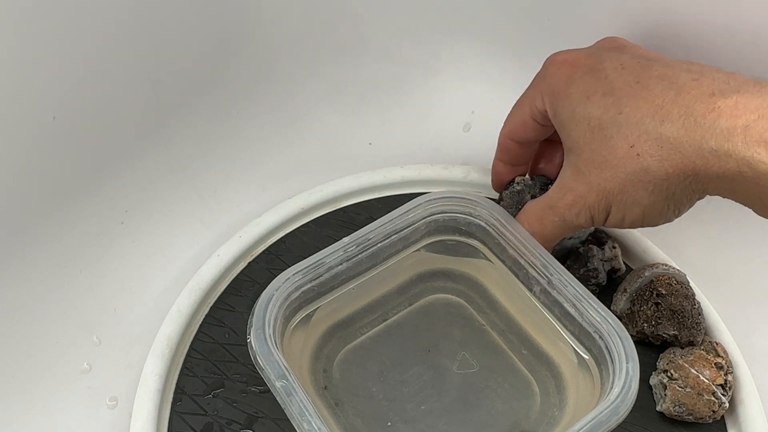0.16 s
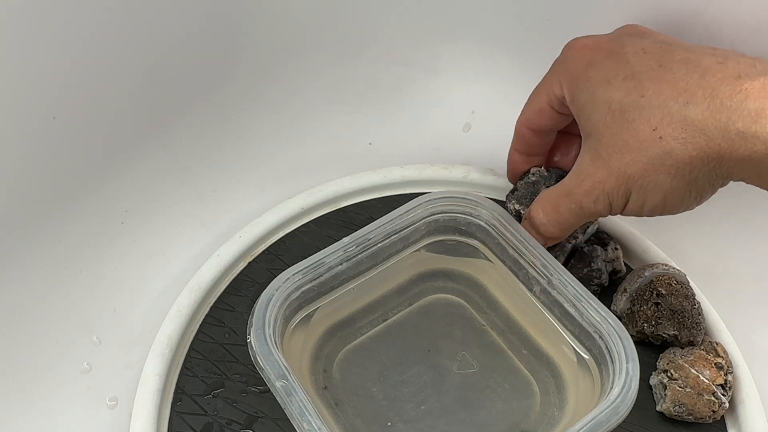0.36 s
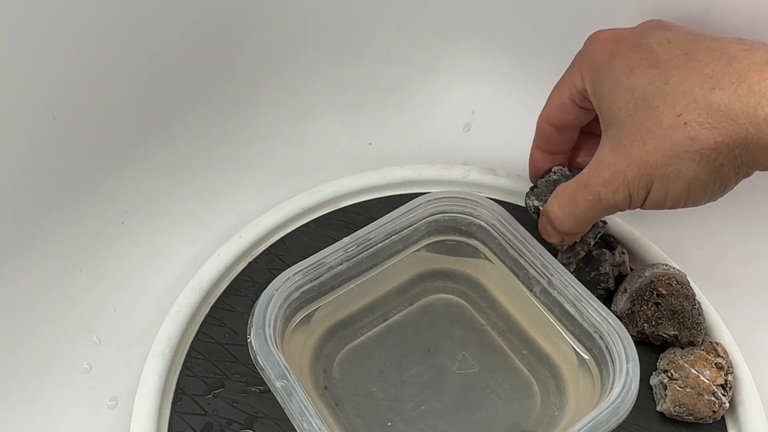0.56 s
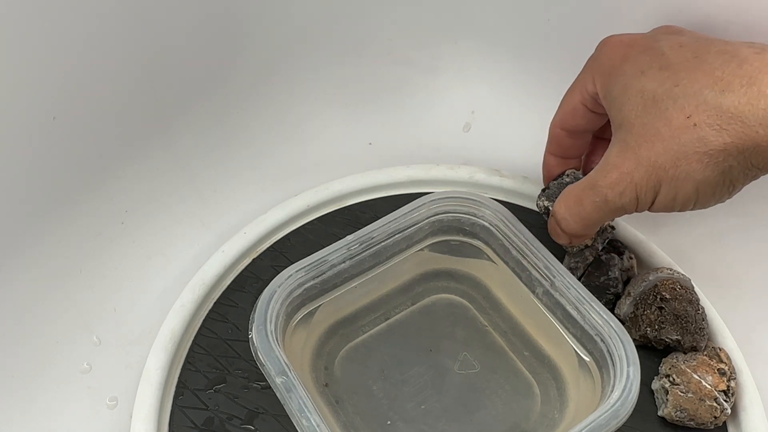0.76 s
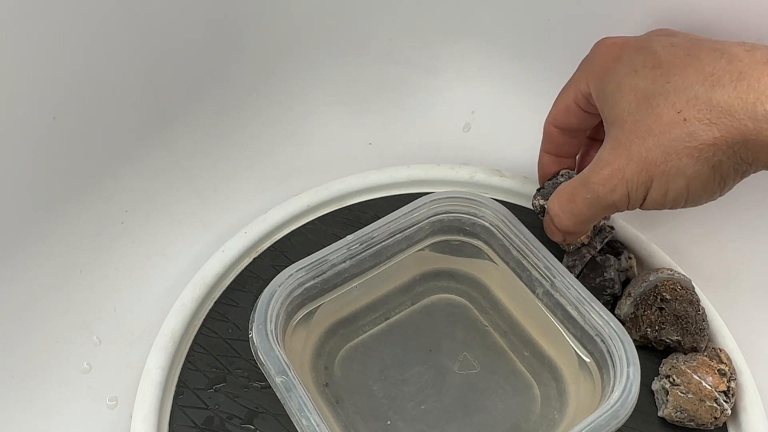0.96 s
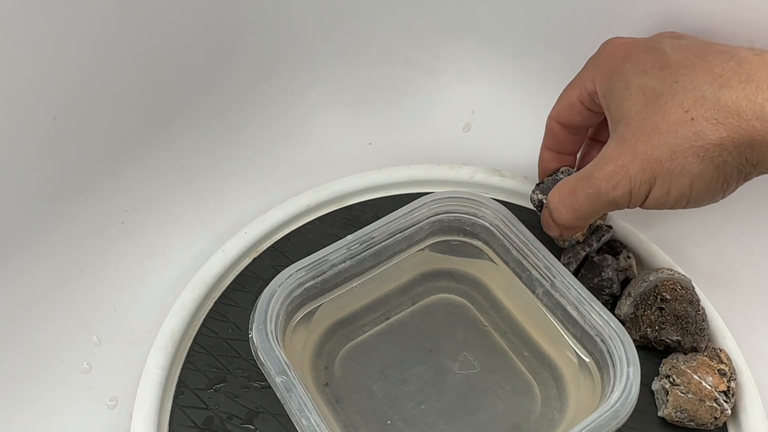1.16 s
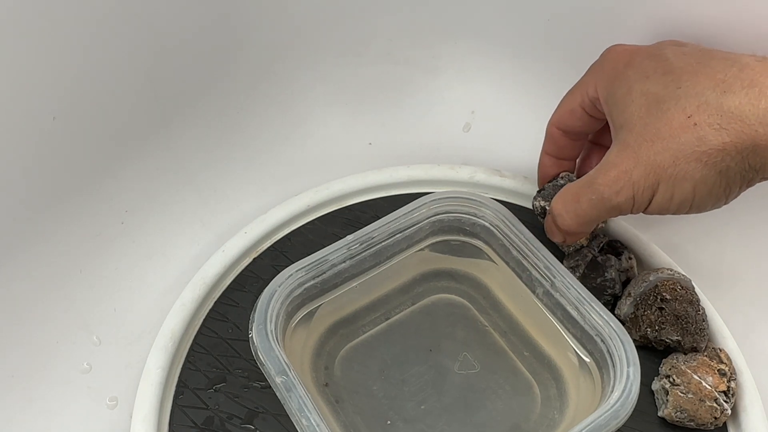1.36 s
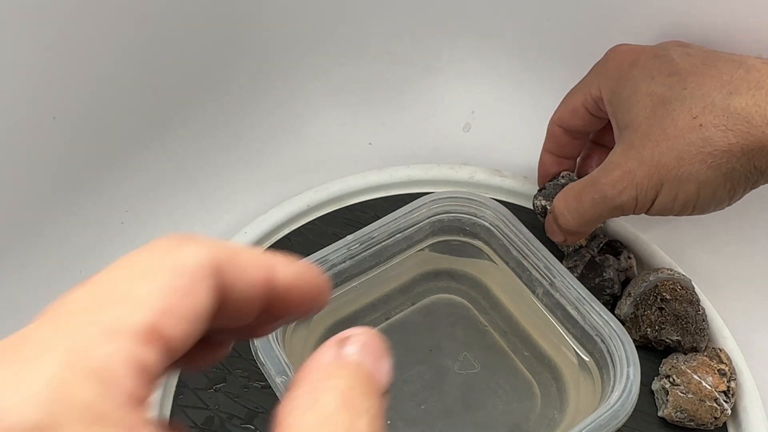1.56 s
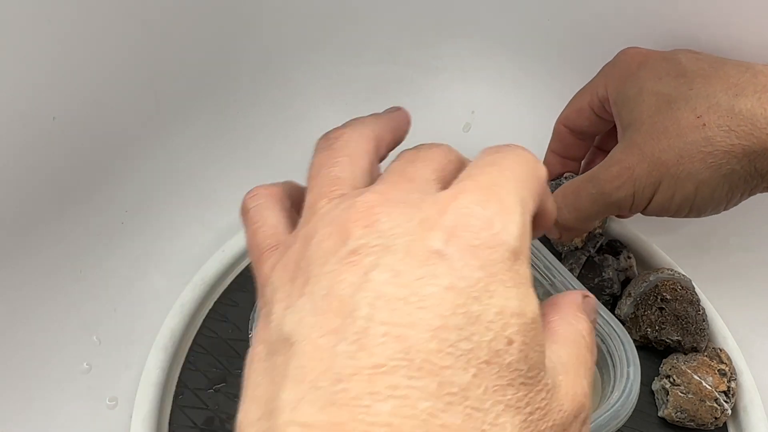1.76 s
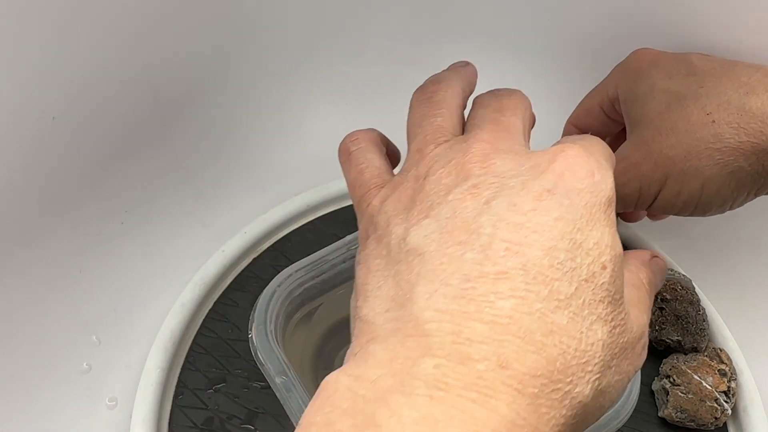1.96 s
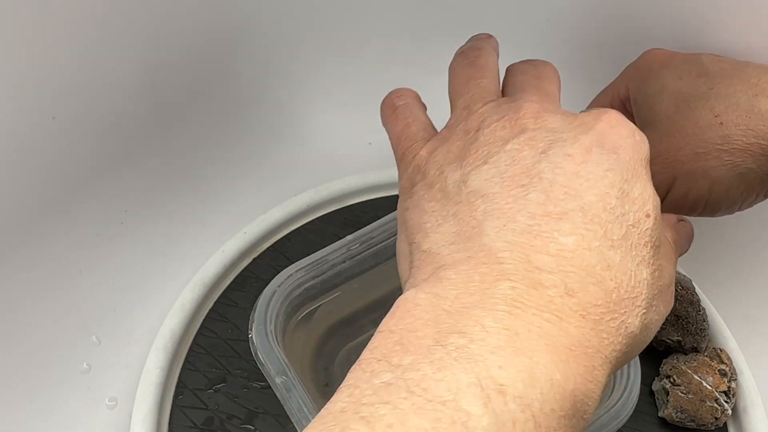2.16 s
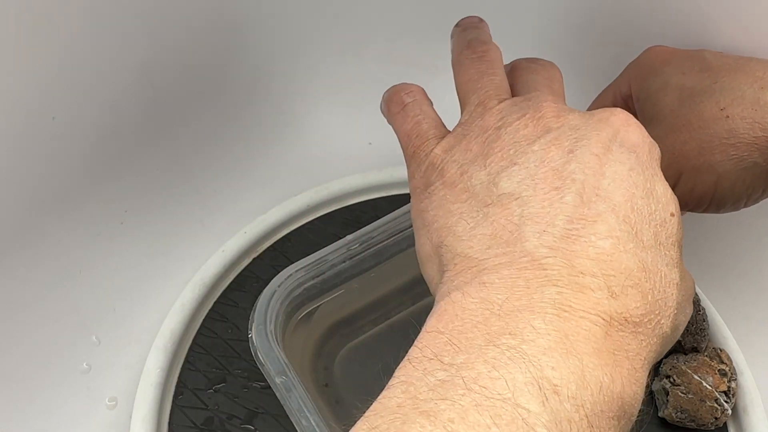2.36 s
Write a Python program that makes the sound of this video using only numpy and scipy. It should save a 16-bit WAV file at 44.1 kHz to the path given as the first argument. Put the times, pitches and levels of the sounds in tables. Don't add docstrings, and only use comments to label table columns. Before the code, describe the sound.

Stone clatter up close: sharp clicks, hollow plastic knocks and short gritty scrapes in a basin

```python
import sys
import numpy as np
from scipy import signal
from scipy.fft import rfft, irfft
from scipy.io import wavfile
from scipy.ndimage import uniform_filter1d

SR = 44100
rng = np.random.default_rng(int(sys.argv[2]) if len(sys.argv) > 2 else 0)


def gain_from_decibels(decibels):
    exponent = np.asarray(decibels, float) / 20
    return 10 ** exponent


def int16_out(signal):
    q = np.round(np.clip(np.atleast_2d(signal).T, -1, 1) * 32767)
    wavfile.write(sys.argv[1], SR, q.astype(np.int16))


N = 105840

# [f/Hz, level/dB]
HUSH_COLOUR = [(20, -46), (42, -9.5), (80, 10.5), (460, -8.5), (1290, -20.5), (1550, -23), (5500, -40),
               (14000, -45.5)]
# [f/Hz, width/Hz, level/dB]
RUMBLE = [
    (58.2, 10, 1),
    (114, 13, -56.5),
    (14300, 900, -79),
]
# [t/s, level/dB]
HUM_SWELL = [(0.0, -60), (0.69, -49), (0.97, -61), (1.02, -48), (1.28, -52), (1.31, -61), (1.36, -47),
             (1.42, -61), (1.45, -46), (1.82, -56.5), (1.86, -48), (1.91, -58), (2.01, -47.5), (2.05, -58),
             (2.08, -46), (2.15, -54.5), (2.25, -47), (2.4, -65.5)]
# [f/Hz, level/dB]
GRIT_COLOUR = [(1500, -6.5), (2500, -8), (4500, -11), (6500, -5.5), (9000, -10.5), (16000, -14.5)]
# [start t/s, length/s, body level/dB, centre f/Hz, grit level/dB]
SCRAPES = [(.01, 0.087, -52, 710, -61.5), (0.071, 0.083, -52, 500, -57), (0.174, 0.027, -42.5, 680, -74),
           (0.218, 0.05, -42, 820, -66), (0.333, 0.043, -39.5, 940, -65), (0.434, 0.023, -34.5, 900, -52.5),
           (0.451, 0.25, -42, 402.6, -61), (0.688, .1, -52, 303.5, -62.5), (0.796, 0.048, -41, 900, -64.5),
           (0.86, 0.034, -40, 996, -71.5), (0.9, 0.06, -51, 702, -80), (1.105, 0.045, -53, 900, -88.5),
           (1.286, 0.033, -38, 800, -58.5), (1.326, 0.047, -45.5, 438, -88.5),
           (1.56, 0.15, -66.5, 500, -76.5), (1.767, 0.036, -55.5, 500, -59), (1.937, 0.16, -47.5, 343, -65),
           (2.047, 0.019, -33, 729, -52), (2.098, 0.12, -54, 335, -73), (2.282, 0.019, -62, 900, -96)]
# [start t/s, length/s,
# level/dB, centre f/Hz]
RUBS = [(0.011, .14, -56.5, 1300), (.185, 0.017, -43.5, 465), (0.23, 0.055, -39.5, 452),
        (0.49, 0.032, -36.5, 458), (0.57, .035, -36, 430), (.53, .03, -53.5, 120), (0.63, .06, -53.5, 115),
        (.74, 0.057, -55.5, 500), (.9, .06, -50, 1173), (1.402, 0.13, -57.5, 1230),
        (1.585, 0.015, -45.5, 515), (1.642, 0.017, -51.5, 500), (1.758, 0.012, -46, 448),
        (1.77, 0.051, -63.5, 900), (2.1, 0.011, -42, 1040), (1.96, .04, -49.5, 136.5),
        (2.06, .03, -36.5, 130), (2.1, .14, -53.5, 116), (2.187, 0.031, -61.5, 1120),
        (2.287, 0.022, -51, 830), (1.22, .05, -64, 420), (2.066, .045, -36, 270), (2.058, 0.016, -30, 640),
        (.967, 0.012, -39.5, 950), (1.0, 0.044, -53, 1100), (1.17, .04, -57.5, 1060),
        (1.255, 0.01, -52, 1150), (1.94, .06, -47.5, 460), (.24, 0.027, -42, 1050), (.012, .012, -48, 600),
        (.436, .012, -38.5, 620), (2.33, 0.011, -54, 910), (1.45, 0.09, -56.5, 120), (0.31, .05, -50.5, 93),
        (.82, 0.022, -44, 1100), (2.4, 0.035, -54, 780)]
# [t/s, peak level/dB, centre f/Hz, contact/s]
KNOCKS = [
    (0.074, -39.5, 480, 0.004),
    (0.438, -28.5, 669, 0.0038),
    (0.545, -32, 480.6, 0.0043),
    (0.576, -28, 451, 0.004),
    (0.783, -48.5, 450, 0.0045),
    (0.969, -40.5, 486, 0.00324),
    (1.347, -31.5, 486, 0.00386),
    (1.688, -51.5, 474, 0.0042),
    (2.059, -27, 800, 0.0036),
]
# [t/s, peak level/dB, centre f/Hz, contact/s]
TAPS = [(0.185, -38.5, 1083, 0.0042), (0.215, -37, 998, 0.0043), (0.34, -40.5, 1249, 0.0037),
        (0.462, -27.5, 1042, 0.0033), (0.62, -33.5, 1057, 0.004), (0.658, -27.5, 1270, 0.0045),
        (0.709, -36.5, 1062, 0.004), (0.823, -31.5, 974, 0.004), (0.869, -35, 1370, 0.0041),
        (1.061, -48, 990, 0.0031), (1.14, -43.5, 1353, 0.0044), (1.686, -51.5, 1270, 0.0048),
        (1.859, -43.5, 1270, 0.0043), (1.994, -36.5, 1360, 0.00395), (2.029, -34, 1270, 0.0041),
        (2.333, -48.5, 885, 0.00356), (1.762, -40, 1890, 0.0037), (1.112, -56, 1720, 0.005),
        (.547, -32, 2075, .004)]
# [f/Hz, level/dB, time to fall 60 dB/s, share in the side channel]
MODES = [(115.6, 8, 0.14, -0.18), (149.4, 3.5, 0.15, -.2), (219, -4.5, 0.081, 0.28), (256.3, 0, 0.13, 0.3),
         (370.6, -5.5, 0.042, -0.76), (457.4, -2.5, 0.052, 0.42), (554.6, -6.5, 0.056, 0.32),
         (755, -6.5, 0.017, 0.44), (900, -7, 0.04, -0.4), (1049, -6, 0.077, 0.48), (1270, -3, 0.031, 1.),
         (1374, -10, 0.046, -0.12), (1743, -14, 0.091, 0.53), (2075, -18.5, 0.018, -3.4)]
# [t/s, peak level/dB, centre f/Hz, time to fall 60 dB/s]
CLICKS = [(0.033, -48, 4170, 0.028), (0.0775, -27, 3150, 0.016), (0.3387, -42, 7200, 0.025),
          (0.4359, -32, 3100, 0.081), (0.4593, -30.5, 5470, 0.013), (0.4642, -18.5, 6150, 0.009),
          (0.4985, -34.5, 2980, 0.068), (0.5032, -24, 4470, 0.03), (0.521, -29, 5440, 0.014),
          (0.5299, -22.5, 5280, 0.016), (0.5461, -11, 5940, 0.034), (0.573, -3, 7330, 0.027),
          (0.6221, -21, 5180, 0.023), (0.66, -16, 3600, 0.02), (0.7077, -39, 2700, 0.052),
          (0.823, -39, 3220, 0.068), (0.8792, -42, 2910, 0.024), (0.9658, -54, 5160, 0.04),
          (1.2933, -47.5, 6770, 0.076), (1.3043, -42.5, 3150, 0.028), (1.3437, -16.5, 5250, 0.015),
          (1.6851, -43, 3030, 0.036), (1.7607, -29.5, 5150, 0.024), (1.9725, -41.5, 5280, 0.043),
          (1.9922, -26, 5520, 0.025), (2.03, -35.5, 3100, 0.052), (2.054, -21, 5460, 0.043),
          (2.398, -35, 6430, 0.047)]
# [f/Hz, level/dB]
STONE_COLOUR = [(900, -49), (1500, 10), (2500, -4), (5400, 4.5), (7500, 2.5), (8800, -1.5), (13400, 2.5),
                (16500, 3)]
# [delay t/s, level/dB]
WALL_ECHOES = [
    (.0024, -14),
    (.0055, -15),
]
# [f/Hz, level/dB]
HOUSING = [(9200, -2), (10300, -24), (11500, -38), (13300, -12.5), (15800, -23.5), (16600, -74.5)]
# [f/Hz, left lead/radians]
PORT_PHASE = [(1200, .1), (3000, 1.3), (4100, 1.), (4900, 1.35), (7400, 1.2), (8300, .6), (10000, .7),
              (13000, 1.1)]
# [f/Hz, left minus right level/dB]
PORT_LEVEL = [(60, 0), (300, 1.5), (1300, -.5), (4400, 2), (8000, 2.5), (15000, -0.5)]

SIDES = np.array([[1], [-1]])


def curve(table, hz):
    table = np.array(table, float)
    return np.interp(np.log(np.maximum(hz, 1)), np.log(table[:, 0]), table[:, 1])


def shape(x, gain):
    n = x.shape[-1]
    hz = np.arange(n // 2 + 1) * SR / n
    return irfft(rfft(x) * gain(hz), n)


def unit(x):
    return x / np.sqrt(np.mean(x ** 2))


def bell(hz, centre_hz, octaves):
    distance = np.log2(np.maximum(hz, 1) / centre_hz) / octaves
    return np.exp(-.5 * distance ** 2)


def walk(rate):
    k = int(SR / rate)
    smooth = uniform_filter1d(rng.standard_normal(N), k)
    return unit(uniform_filter1d(smooth, k))


def spans(start, length, rise, fall):
    t = np.arange(N) / SR - start[:, None]
    after_end = np.clip(t - np.abs(length)[:, None], 0, 1)
    return np.clip(t / rise, 0, 1) * np.exp(-after_end / fall)


def slides(table, db):
    start, length = np.array(table).T[:2]
    rise_s = np.clip(0.37 * np.abs(length), .003, .03)
    return spans(start, length, rise_s[:, None], 0.014) * gain_from_decibels(db)[:, None]


def floor():
    mid, side = rng.standard_normal((2, N))
    mid = shape(mid, lambda f: gain_from_decibels(curve(HUSH_COLOUR, f)))
    side = shape(side, lambda f: gain_from_decibels(curve(HUSH_COLOUR, f)) * np.minimum(f / 500, .8))
    hush_db = -52 + walk(2.2) + walk(20)
    out = gain_from_decibels(hush_db) * (mid + side * SIDES) / mid.std()
    swell_db = np.interp(np.arange(N) / SR, *np.array(HUM_SWELL).T)
    for hz, width_hz, db in RUMBLE:
        noise = rng.standard_normal(N)
        band = shape(noise, lambda f: np.exp(-.5 * ((f - hz) / width_hz) ** 2))
        drift_db = swell_db if hz < 80 else 2 * walk(3.3)
        out = out + gain_from_decibels(db + drift_db) * unit(band)
    return out


def room(x):
    t60_s, treble_db, low_db = 0.4, -18, -11.5
    t = np.arange(SR // 2) / SR
    tail = rng.standard_normal((2, len(t))) * gain_from_decibels(-60 * t / t60_s) * np.clip(t / 0.023, 0, 1)

    def colour(f):
        tiles = bell(f, 5300, 0.85) + gain_from_decibels(-5) * (f > 11000)
        return gain_from_decibels(treble_db) * tiles + gain_from_decibels(low_db) * bell(f, 300, 0.86)

    tail = shape(tail, colour) / np.sqrt(t60_s * SR / 14)
    return signal.fftconvolve(x[None], tail, axes=1)[:, :N]


def grit():
    grain_db = 3 * rng.standard_normal(N) + 1.5 * walk(170)
    grains = rng.standard_normal(N) * gain_from_decibels(grain_db)
    hiss = unit(shape(grains, lambda f: gain_from_decibels(curve(GRIT_COLOUR, f)) * (f > 1300)))
    pressure = slides(SCRAPES, np.array(SCRAPES).T[4]).sum(axis=0)
    return hiss * pressure


def stick_slip():
    slips_per_s = 900
    pulses = rng.random(N) < slips_per_s / SR
    pulse_db = 3 * rng.standard_normal(N) + 1.2 * walk(60)
    return unit(pulses * gain_from_decibels(pulse_db))


def crunch(push):
    mid, side = push * rng.standard_normal((2, N)) * [[1], [.6]]
    return gain_from_decibels(-24.5) * 10 * shape(mid + side * SIDES, lambda f: bell(f, 1542, 0.74))


def body():
    when, knock_db, knock_hz, contact_s = np.array(KNOCKS + TAPS).T
    contact_s = np.clip(contact_s, .001, .03)
    strength = gain_from_decibels(knock_db + 7.5)
    is_tap = knock_hz > 800
    knock_octaves = np.where(is_tap, 0.3, 1.11)
    scrape, rub = np.array(SCRAPES).T, np.array(RUBS).T
    scraping, rubbing = slides(SCRAPES, scrape[2]), slides(RUBS, rub[2])
    slips = stick_slip()

    crunch_strength = strength * np.where(is_tap, gain_from_decibels(-8), 1)
    push = crunch_strength @ spans(when, 0 * when, 0.00033, contact_s[:, None])
    out = crunch(push + .5 * scraping.sum(axis=0))

    chance = rng.random((len(strength), len(MODES), 2))
    for k, (hz, db, t60, side) in enumerate(MODES):
        pressure = bell(hz, scrape[3], 1.656) @ scraping + bell(hz, rub[3], 0.24) @ rubbing
        drive = pressure * slips * rng.choice([-1., 1.], N)
        sign = np.sign(chance[:, k, 0] - .5)
        blow = 10 * strength * bell(hz, knock_hz, knock_octaves) * sign
        moment = when + contact_s * chance[:, k, 1] * min(1000 / hz, 2)
        drive = drive + np.bincount((moment * SR).astype(int), blow, N)[:N]
        pole = np.exp(2j * np.pi * hz / SR - np.log(1000) / (max(t60, .01) * SR))
        drive = shape(drive, lambda f: 1 / (1 + (f / 2400) ** 6))
        drive = drive * gain_from_decibels(db) * np.sqrt(1 - abs(pole))
        ring = signal.lfilter([1], [1, -pole], drive)
        out += ring.imag + side * SIDES * (ring.real - drive)
    return out


def clicks():
    when, db, hz, t60 = np.array(CLICKS).T
    size, lead_s, chatter_db, split_hz = 4096, .003, -12.5, 11500
    t = np.arange(size) / SR - lead_s
    fade = gain_from_decibels(-60 * np.abs(t) / np.clip(t60, .008, .2)[:, None])
    chatter = rng.standard_normal((len(when), size)) * np.clip(t / 0.002, 0, 1) ** 2 * fade
    tick = np.exp(-.5 * ((t - .001) * SR) ** 2)

    def stone(f):
        walls = 1 + sum(gain_from_decibels(g_db) * np.exp(-2j * np.pi * f * lag) for lag, g_db in WALL_ECHOES)
        return gain_from_decibels(curve(STONE_COLOUR, f)) * walls

    main = shape(tick + gain_from_decibels(chatter_db) * chatter,
                 lambda f: stone(f) * bell(f, hz[:, None], 0.62) * (f < split_hz))
    air = shape(tick + gain_from_decibels(chatter_db - 9) * chatter, lambda f: stone(f) * (f > split_hz))
    waves = main + gain_from_decibels(4.5 + 0.9 * db[:, None]) * air
    out = np.zeros(N + size)
    for start, peak_db, wave in zip(when, db, waves):
        i = int((start - lead_s) * SR)
        out[i:i + size] += wave * gain_from_decibels(peak_db + 0.5) / np.abs(wave).max()
    return out[:N]


def scene():
    near = clicks() + grit() + body()
    return near + room(near[0]) + floor()


def top_cut(x):
    return signal.sosfilt(signal.butter(12, 16800, fs=SR, output="sos"), x)


def record(dry):
    half = np.array([[.5], [-.5]])

    def response(f):
        level = gain_from_decibels(curve(HOUSING, f) + half * curve(PORT_LEVEL, f))
        return level * np.exp(1j * half * curve(PORT_PHASE, f))

    ports = shape(np.pad(dry, ((0, 0), (0, 2160))), response)
    return top_cut(ports[:, :N])


dry = scene()
out = record(dry)
int16_out(out)
```